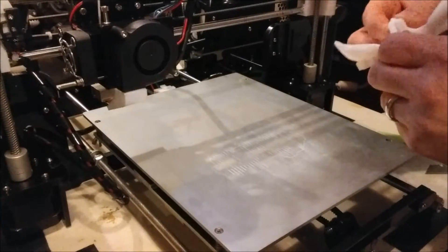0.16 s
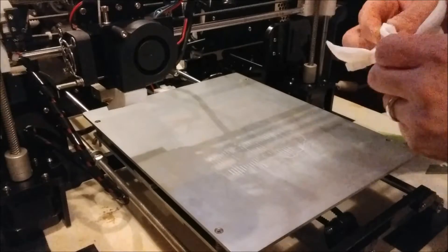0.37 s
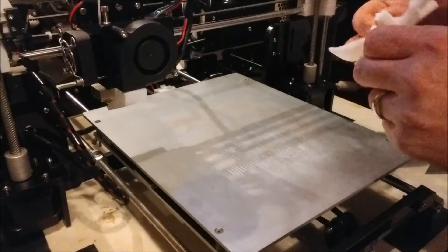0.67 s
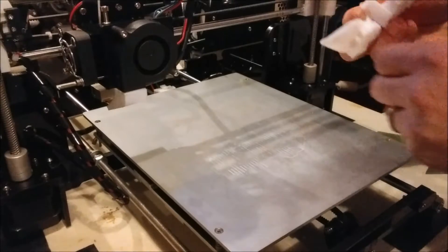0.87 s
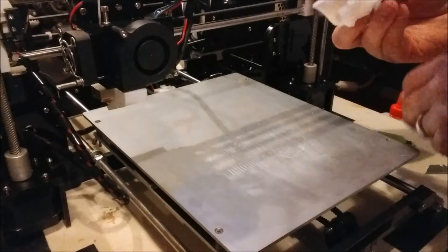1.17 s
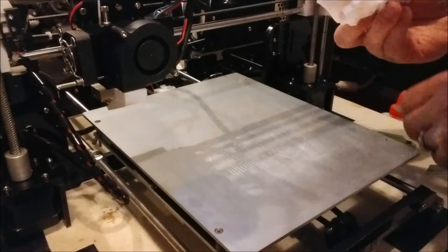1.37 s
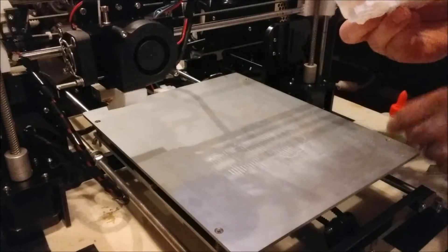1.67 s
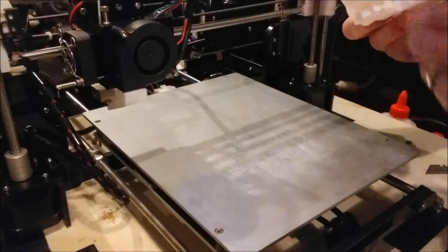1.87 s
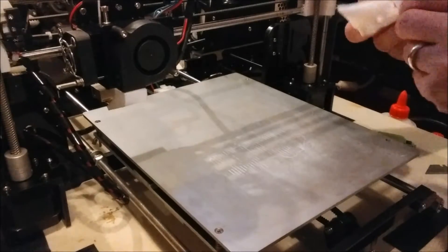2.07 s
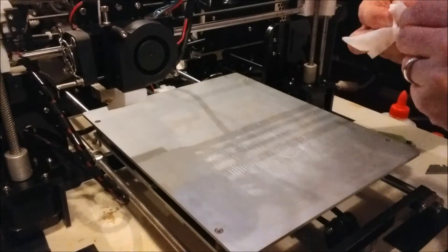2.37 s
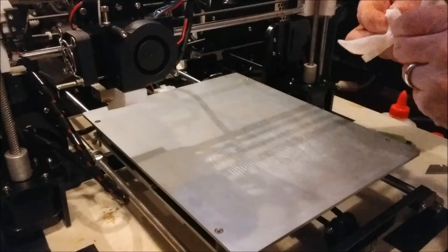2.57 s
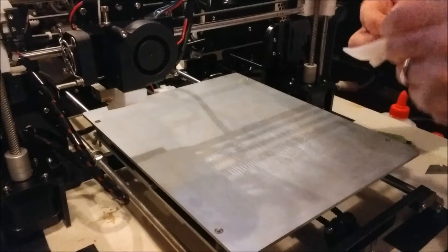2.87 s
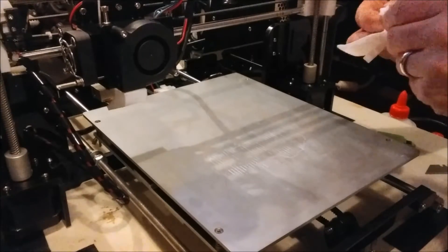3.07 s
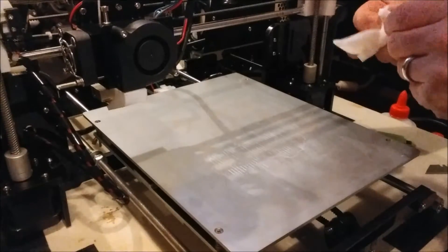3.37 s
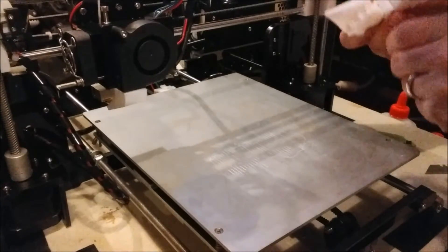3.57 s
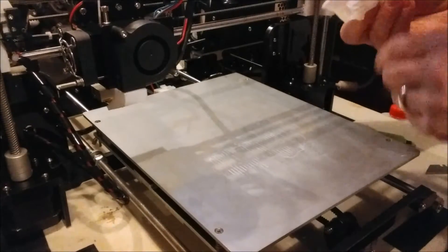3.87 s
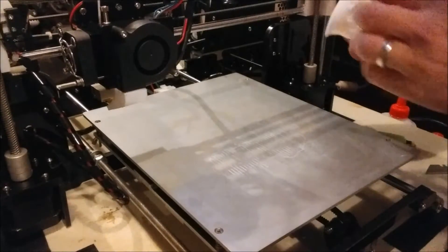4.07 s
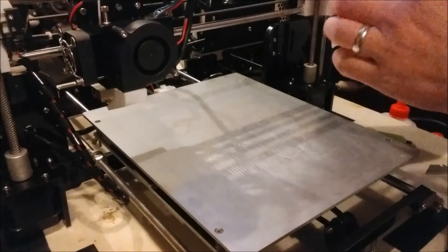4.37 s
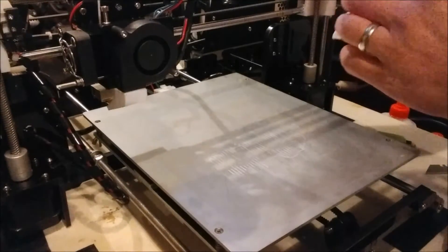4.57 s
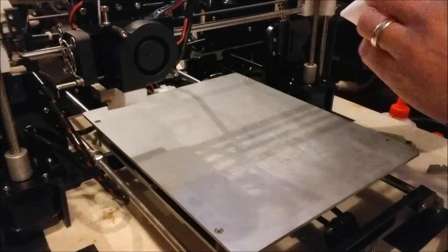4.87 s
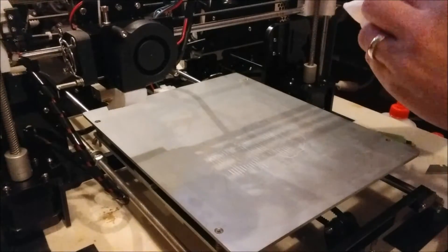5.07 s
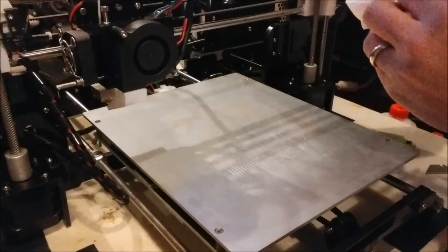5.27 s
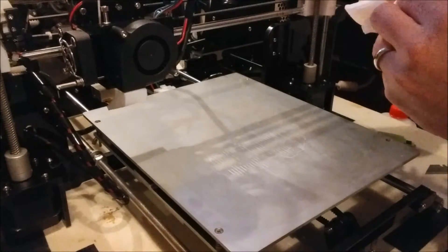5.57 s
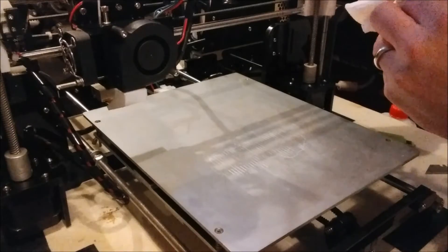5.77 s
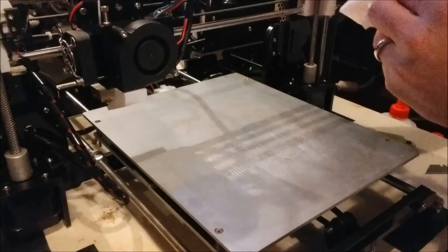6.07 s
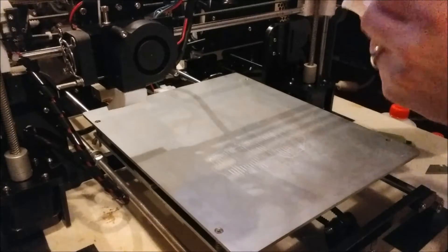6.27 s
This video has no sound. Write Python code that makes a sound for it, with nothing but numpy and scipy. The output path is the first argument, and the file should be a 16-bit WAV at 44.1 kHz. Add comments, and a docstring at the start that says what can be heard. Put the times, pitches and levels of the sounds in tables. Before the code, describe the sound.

A printer's fan whirs faintly throughout, with a low hum and light hiss, in a small room. Close to the microphone, fingernails tick and rasp very softly on a small plastic print from about 0.5 seconds. At 1.7 seconds a thin plastic sliver hits the table with a sharp click, bounces a few times and skitters to rest by 2.1. Between 2.8 and 3.4 seconds strained supports give small, high creaks and faint squeaks. At 3.9 seconds a thicker chunk clacks onto the table, bounces at 4.1 and rattles to a stop by 4.6. A brittle strut snaps sharply at about 5 seconds, followed by a quick cluster of cracks at 5.3. From 5.4 seconds a tiny chip bounces with bright ticks that fade by 5.9, and a last faint nail tick comes near 6.1. Each click has a short room tail.

```python
"""Picking supports off a 3D print

A small room, one microphone close to the table. Beside it an idle printer's fan whirs over faint
hum and hiss. Fingernails tick and rasp on the ridges of a small plastic print. A sliver drops and
bounces, ringing the table; strained supports squeak and creak; a chunk drops too. Then brittle
struts crack in the hand, and a tiny chip ticks to rest. Each click has a short room tail."""
import sys
import numpy as np
from scipy import signal
from scipy.fft import rfft, irfft, next_fast_len
from scipy.io import wavfile
from scipy.ndimage import uniform_filter1d

SR = 44100
rng = np.random.default_rng(int(sys.argv[2]) if len(sys.argv) > 2 else 0)


def transcribe(signal):
    """Save signal, clipped to [-1, 1], as a 16-bit WAV file at the path in sys.argv[1]."""
    frames = np.atleast_2d(signal).T
    limited = np.clip(frames, -1, 1)
    pcm = np.round(limited * 32767).astype(np.int16)
    wavfile.write(sys.argv[1], SR, pcm)


N = 282857


def from_db(db):
    return 10 ** (np.asarray(db) / 20)


def rms_one(x):
    return x / np.sqrt(np.mean(x ** 2) + 1e-20)


def bins(size):
    """Frequencies of a real FFT, kept above zero."""
    return np.maximum(np.arange(size // 2 + 1) * SR / size, 1)


def at_hz(points, hz):
    """Reads the columns of a table on a log-frequency axis."""
    points_hz, *columns = np.transpose(points)
    return np.squeeze([np.interp(np.log(hz), np.log(points_hz), column) for column in columns])


def response_db(colour, modes, hz):
    """A broad colour with steep-sided resonances standing out of it."""
    peaks = sum((from_db(db) ** 2 - 1) / (1 + 2 * ((hz - centre) / width) ** 2) ** 2
                for centre, width, db in modes)
    return at_hz(colour, hz) + 10 * np.log10(np.maximum(1 + peaks, 1e-3))


def coloured(force, colour, modes):
    """A running force through a colour and its resonances, at rms 1."""
    size = 2 * next_fast_len(N // 2 + 1)
    gain = from_db(response_db(colour, modes, bins(size)))
    return rms_one(irfft(rfft(force, size) * gain)[:N])


def noise_band(hz, width_hz):
    """A narrow band of noise at rms 1."""
    band = signal.butter(2, [hz - width_hz / 2, hz + width_hz / 2], "band", fs=SR, output="sos")
    return rms_one(signal.sosfilt(band, rng.standard_normal(N)))


def drift(rate_hz):
    """Slow random wander of spread 1."""
    return rms_one(irfft(rfft(rng.standard_normal(N)) / (1 + (bins(N) / rate_hz) ** 2), N))


def swells(rows):
    """An envelope with one bell-shaped rise and fall for each row."""
    t = np.arange(N) / SR
    return sum(from_db(db) * np.exp(-((t - peak_s) / half_s) ** 2) for peak_s, db, half_s in rows)


def grains(spread_db, size):
    """A dense run of tiny fractures or contacts of very uneven strength."""
    return rng.standard_normal(size) * from_db(spread_db * np.clip(rng.standard_normal(size), -2, 2))


def add(out, start_s, sound):
    at = max(round(start_s * SR), 0)
    out[at:at + len(sound)] += sound[:max(N - at, 0)]


def minimum_phase(x, gain_db):
    """Filters so that resonances ring after the blow, never before it."""
    cepstrum = irfft(np.log(from_db(gain_db)))
    cepstrum[1:len(x) // 2] *= 2
    cepstrum[len(x) // 2 + 1:] = 0
    return irfft(rfft(x) * np.exp(rfft(cepstrum)))


def click(force, colour, modes, body_db, edge_db, body_hz=4300, edge_hz=8700):
    """A force rings the plastic: thick pieces have more low body, thin ones more high edge."""
    hz = bins(len(force))
    # so brief a contact feeds all broad bands alike: the force's own colour is taken out
    force_db = 10 * np.log10(uniform_filter1d(np.abs(rfft(force)) ** 2, size=60) + 1e-9)
    shelves_db = body_db / (1 + (hz / body_hz) ** 6) + edge_db / (1 + (edge_hz / hz) ** 16)
    sound = minimum_phase(force, response_db(colour, modes, hz) + shelves_db - force_db)
    return sound * np.sqrt(.01 * SR / np.sum(sound ** 2))  # the energy of 10 ms at rms 1


# The small room around the table. Each row: frequency in Hz, seconds to fall 60 dB, level in dB.
ROOM_DECAY = [(300, 0.32, -9), (1500, 0.81, 3.5), (3520, 0.43, 4.5), (5140, 0.48, 1.5), (7550, 0.38, 4.5),
              (12000, 0.29, 5), (15000, 0.39, 5)]


def room_tail(build_s=0.00046, size=16384):
    """Uneven reflections, of unit energy in all, that die band by band."""
    t, hz = np.arange(size) / SR, bins(size)
    reflections = rfft(grains(spread_db=5, size=size))
    tail = np.zeros(size)
    edges_hz = np.geomspace(150, 18000, 15)
    for low, high in zip(edges_hz, edges_hz[1:]):
        t60, db = at_hz(ROOM_DECAY, np.sqrt(low * high))
        band = irfft(reflections * ((hz >= low) & (hz < high)), size)
        tail += band * from_db(db - 60 * t / t60)
    tail *= 1 - np.exp(-t / build_s)
    return tail / np.sqrt(np.sum(tail ** 2))


# A surface near the microphone. Each row: delay in seconds, level in dB.
NEAR_ECHOES = [(.0049, -11.5)]


def in_room(force, tail_db, colour, modes, body_db=0, edge_db=0, tail_ring_share=.6):
    """A click as it reaches the microphone: direct, off a near surface, and as the room's tail."""
    direct = click(force, colour, modes, body_db, edge_db)
    # the tail gathers sound from all directions, so its resonances are flatter
    flatter = [(hz, width_hz, db * tail_ring_share) for hz, width_hz, db in modes]
    diffuse = click(signal.unit_impulse(len(force)), colour, flatter, body_db, edge_db)
    out = from_db(tail_db) * signal.fftconvolve(diffuse, room_tail())
    for delay_s, db in [(0.00019, 0)] + NEAR_ECHOES:
        add(out, delay_s, from_db(db) * direct)
    return out


# Air from the printer's cooling fan. Each row: frequency in Hz, relative level in dB.
FAN_COLOUR = [(25, -22), (60, -15), (130, -5), (220, -5), (300, -2), (560, 0), (900, -1.5), (1150, -7),
              (2000, -10), (2700, -10), (3400, -19.5), (8000, -34)]
# Resonances of its housing and frame. Each row: frequency in Hz, width in Hz, height in dB.
HOUSING_MODES = [(84, 10, 12), (175, 20, 7), (260, 14, 4), (297, 22, 9), (336, 12, 10), (365, 8, 6),
                 (411, 14, 9), (467, 12, 9), (495, 14, 9), (525, 20, 5), (564, 10, 12), (579, 10, 14),
                 (622, 14, 7), (660, 11, 14), (747, 12, 4), (786, 8, 6), (850, 12, 5), (867, 8, 9),
                 (918, 20, 7), (972, 28, 10), (1092, 18, 6), (1355, 50, 6), (1447, 20, 5), (1699, 22, 12)]


def fan(level_db=-58, flutter_db=1.3):
    """Gently fluttering air rings the fan's housing."""
    gain = from_db(level_db + flutter_db * drift(rate_hz=10))
    return gain * coloured(rng.standard_normal(N), FAN_COLOUR, HOUSING_MODES)


def mains_hum(hz=120.2, level_db=-78):
    """The mains hums on one faint, steady tone."""
    t = np.arange(N) / SR
    return from_db(level_db) * rms_one(np.sin(2 * np.pi * hz * t))


# The hiss behind everything. Each row: frequency in Hz, relative level in dB.
HISS_COLOUR = [(1000, -24), (3600, -6.5), (4500, 1), (5200, 0), (6200, -1), (7600, 5), (8050, -3.5),
               (8600, -12), (10300, -6), (11600, -11), (13000, -18.5), (16000, -24)]


def hiss(level_db=-65.5):
    """An even, bright noise floor."""
    return from_db(level_db) * coloured(rng.standard_normal(N), HISS_COLOUR, [])


# A faint flutter in the background. Each row: centre in Hz, width in Hz, level in dB.
FLUTTER_BANDS = [(2403, 230, -71.5), (4506, 380, -74.5)]


def fluttering_bands(flutter_db=3, flutter_hz=25):
    """Two faint, narrow bands of background noise near 2.4 and 4.5 kHz flutter quickly."""
    out = np.zeros(N)
    for hz, width_hz, db in FLUTTER_BANDS:
        fluttering = noise_band(hz, width_hz) * from_db(flutter_db * drift(flutter_hz))
        out += from_db(db) * rms_one(fluttering)
    return out


# Fingernails on the print, faint even up close. Each row: start in seconds, level in dB, ring in Hz.
NAIL_PICKS = [(.4535, -68, 10000), (.458, -73, 11000), (.608, -67, 13300), (.617, -65, 11300),
              (2.829, -70, 11800), (2.848, -65, 11500), (3.2305, -72, 12000), (4.776, -69, 12000),
              (4.932, -74, 13000), (5.745, -59, 13500), (5.886, -65, 14000), (6.072, -63.5, 10200)]
# Their colour. Each row: frequency in Hz, relative level in dB.
NAIL_COLOUR = [(1000, -35), (6000, -3), (9500, -2), (12000, -1), (15000, -14), (16000, -13)]


def nail_picks(fade_s=0.0016, ring_width_hz=900, ring_db=5, tail_db=-7, size=2048):
    """A fingernail flicks over a layer ridge: a dry tick, all treble."""
    out, t = np.zeros(N), np.arange(size) / SR
    for start_s, db, ring_hz in NAIL_PICKS:
        force = grains(spread_db=4, size=size) * np.exp(-t / fade_s)
        modes = [(ring_hz, ring_width_hz, ring_db)]
        add(out, start_s, from_db(db) * in_room(force, tail_db, NAIL_COLOUR, modes))
    return out


# Fingers rubbing the print, and loose bits skittering.
# Each row: peak time in seconds, level in dB, half length in seconds.
RUB_STROKES = [(0.648, -64.5, 0.043), (1.154, -67, .065), (1.91, -58.5, 0.17), (2.915, -64, 0.098),
               (3.168, -69.5, 0.15), (3.387, -62.5, 0.049), (4.408, -58, 0.29)]
# The rasp's colour. Each row: frequency in Hz, relative level in dB.
RASP_COLOUR = [(200, -25), (700, -6), (2400, -11.5), (4500, -3.5), (6500, -2), (7800, -9), (8700, -20),
               (11500, -12.5), (13500, -31), (16000, -28)]
# Its resonances. Each row: frequency in Hz, width in Hz, height in dB.
RASP_MODES = [(1750, 100, 16), (3100, 73, 9.4), (5700, 160, 2)]


def rubs(roughness_db=3.5):
    """Ridged layers catch and slip in a fine rasp that swells and fades with each stroke."""
    friction = grains(spread_db=2.5, size=N) * from_db(roughness_db * drift(rate_hz=55))
    return swells(RUB_STROKES) * coloured(friction, RASP_COLOUR, RASP_MODES)


# A drone in the fan. Each row: peak time in seconds, level in dB, half length in seconds.
DRONE_SWELLS = [(0.87, -73, .05), (1.187, -60.5, 0.076), (1.9, -53.5, 0.025), (1.984, -58, 0.063),
                (2.326, -64, 0.067), (6.025, -55, 0.055)]


def fan_drone():
    """The fan's strongest resonance swells now and then."""
    return swells(DRONE_SWELLS) * noise_band(hz=570, width_hz=36)


def bending_waves(force, lag_s):
    """In a board the treble outruns the bass; lag_s is the travel time at 1 kHz."""
    hz = bins(len(force))
    delay_s = lag_s * (np.sqrt(1000 / np.maximum(hz, 300)) - np.sqrt(1000 / hz[-1]))
    phase = 2 * np.pi * np.cumsum(delay_s) * SR / len(force)
    return irfft(rfft(force) * np.exp(-1j * phase))


def struck_spot(modes, spread_db=1.2):
    """Each spot that is hit favours other resonances."""
    shifts_db = spread_db * np.clip(rng.standard_normal(len(modes)), -1.5, 1.5)
    return [(hz, width_hz, db + shift) for (hz, width_hz, db), shift in zip(modes, shifts_db)]


# Bits landing on the table, near the microphone. Each row: start in seconds, level in dB, edge in dB
# (high on a corner, low on a flat side), height of the table's clack in dB, bit (0 sliver, 1 chunk).
LANDINGS = [(1.7009, -29.5, 10.5, 4.1, 0), (1.7035, -32, 1, 5.1, 0), (1.7078, -32.5, 5, 6.3, 0),
            (1.7849, -43.5, 8, 4, 0), (1.8464, -40.5, 8, 6, 0), (1.896, -43.5, 4, 5.2, 0),
            (1.93, -65, -9, 12, 0), (1.955, -57, 3, 8.7, 0), (1.969, -61, -9, 10, 0), (2.0, -57, -9, 13, 0),
            (2.014, -62, -6, 10, 0), (2.037, -61, -9, 11, 0), (2.054, -57.5, -7, 8.3, 0),
            (3.9448, -26, 1.5, 12, 1), (4.1446, -30, 2.5, 1.8, 1), (4.2775, -39, 2.5, 17, 1),
            (4.302, -43, 1, 9.9, 1), (4.3853, -39, 12, 12, 1), (4.4525, -45, -8, 15, 1),
            (4.4805, -48, -8, 7.1, 1), (4.5304, -39.5, -13, 13, 1), (4.561, -53, -9, 3, 1),
            (4.5903, -51.5, 1, 11, 1), (4.613, -56, -11, 6, 1)]
# A landing's colour. Each row: frequency in Hz, relative level in dB.
LANDING_COLOUR = [(40, -47), (150, -20), (600, -4), (1450, -4), (2600, 1), (5600, -3), (6700, 0),
                  (7900, -5.5), (8500, -13.5), (9900, -12), (11100, -17), (12100, -18.5), (12900, -31),
                  (16000, -39)]
# Resonances of the table, the hollows between them, and resonances of the thin sliver and the thicker
# chunk. Each row: frequency in Hz, width in Hz, height in dB.
TABLETOP_MODES = [(570, 50, 9), (660, 45, 5), (780, 50, 6), (950, 70, 5), (1705, 48, 12), (2105, 110, 8),
                  (2520, 90, 3), (4130, 130, 7), (4870, 130, 8), (5740, 120, 3), (6760, 110, 4),
                  (7610, 130, 4)]
TABLETOP_HOLLOWS = [(1090, 140, -6), (1520, 280, -14), (1900, 150, -9), (2700, 260, -9), (4700, 160, -4),
                    (5330, 260, -3)]
SLIVER_RINGS = [(3090, 57, 13), (6540, 280, 11), (7800, 690, 7), (11560, 420, 14.5), (13600, 1150, 10)]
CHUNK_RINGS = [(1290, 170, 7.6), (3470, 280, 2.8), (3820, 110, 2.4), (4380, 350, 3.8), (5530, 130, 3.2),
               (6300, 130, 2.1), (9700, 400, 2.2), (11900, 440, 10.6), (14600, 1000, 2)]


def bounces(contact_s=.0017, rattle_db=-21, rattle_s=0.0085, clack_width_hz=180, size=4096):
    """A springy bit meets the table with several corners: a burst of chatter, then a faint rattle."""
    out, t = np.zeros(N), np.arange(size) / SR
    age = t / contact_s
    chatter = (age + 0.32) * np.exp(-age)
    rattle = from_db(rattle_db) * np.exp(-t / rattle_s)
    for start_s, db, edge_db, clack_db, is_chunk in LANDINGS:
        if is_chunk:
            bit_modes, neutral_db, bass_db = CHUNK_RINGS, -36.5, 0
        else:  # the light sliver hardly moves the table, so it has less bass
            bit_modes, neutral_db, bass_db = SLIVER_RINGS, -41.5, -3.5
        colour = [(hz, level_db + bass_db * (hz < 1600)) for hz, level_db in LANDING_COLOUR]
        body_db = neutral_db - db  # a softer landing is duller
        contacts = grains(spread_db=2.0, size=size) * (chatter + rattle)
        force = bending_waves(contacts, lag_s=0.002224)
        modes = struck_spot(TABLETOP_MODES + bit_modes) + TABLETOP_HOLLOWS
        clack_hz = 3110 + rng.uniform(-98, 70)  # the pitch strays from spot to spot
        modes.append((clack_hz, clack_width_hz, clack_db))
        landing = in_room(force, tail_db=-10, colour=colour, modes=modes,
                          body_db=body_db, edge_db=edge_db)
        add(out, start_s, from_db(db) * landing)
    return out


# A support bent in the hand. Each row: peak time in seconds, level in dB, half length in seconds.
SQUEAK_SLIPS = [(2.844, -62.5, 0.017), (3.115, -58, .004), (3.16, -65, 0.028)]


def squeaks():
    """Strained plastic slips on plastic in a short, narrow squeak."""
    return swells(SQUEAK_SLIPS) * noise_band(hz=6060, width_hz=410)


def crack(fade_s, colour, modes, body_db, edge_db, tail_db, first_break=2.2, size=4096):
    """Brittle plastic: one sharp impulse, then a dying run of tiny ones, heard in the room."""
    t = np.arange(size) / SR
    force = rms_one(grains(spread_db=3.0, size=size)) * np.exp(-t / fade_s)
    force[0] = first_break
    return in_room(force, tail_db, colour, modes, body_db, edge_db)


# Struts slipping under strain. Each row: start in seconds, level in dB, fade time in seconds,
# edge in dB, lower ring in Hz, upper ring in Hz.
STRUT_CREAKS = [(2.88, -56, .01, 0, 3280, 6100), (2.892, -56, .0023, 8, 7040, 10300),
                (2.896, -44.5, .0008, 9, 6000, 7100), (2.8978, -54, 0.0037, 0, 3150, 9400),
                (2.956, -54, 0.0076, -11, 3280, 3900), (2.98, -47.5, .0025, -6, 3280, 6620),
                (3.3141, -42.5, 0.0018, 3, 6230, 8040), (3.33, -58, .001, 4, 6300, 7900),
                (3.343, -57, .001, 7, 6150, 7600), (3.351, -58, .001, 4, 6300, 7700)]
# Their colour. Each row: frequency in Hz, relative level in dB.
STRAIN_COLOUR = [(200, -35), (2000, -25), (3400, -4), (4900, -9), (6600, -1.5), (7900, 0), (8800, -10),
                 (9700, -5), (11500, -19), (13000, -26), (16000, -36)]


def creaks(ring_width_hz=330, ring_db=13):
    """A strained strut gives a little without breaking: a small click on two resonances."""
    out = np.zeros(N)
    for start_s, db, fade_s, edge_db, *rings_hz in STRUT_CREAKS:
        modes = [(hz, ring_width_hz, ring_db) for hz in rings_hz]
        creak = crack(fade_s, STRAIN_COLOUR, modes, body_db=0, edge_db=edge_db, tail_db=-8)
        add(out, start_s, from_db(db) * creak)
    return out


# Struts breaking in the hand, close to the microphone. Each row: start in seconds, level in dB,
# fade time in seconds, body in dB (high when the whole print bends), edge in dB (high for a thin
# strut), the strut's own ring in Hz, its height in dB.
STRUT_SNAPS = [(5.051, -25, 0.0016, -9.5, -4.5, 12300, 14), (5.2757, -31, 0.0024, -3, 5.5, 11900, 6),
               (5.2818, -28.5, 0.003, -3.5, 6.5, 12200, 9), (5.2848, -30, 0.0091, 1.5, -5, 5240, 1),
               (5.2934, -30.5, 0.0038, 1, -3, 7600, 4), (5.2964, -37.5, 0.015, 11.5, -10, 7450, 3),
               (5.312, -43, .001, -9, -8, 7300, 5), (5.3274, -47, 0.001, -8, -11, 7600, 12),
               (5.331, -42, 0.0071, -2, -11, 7640, 12)]
# The brittle plastic's colour. Each row: frequency in Hz, relative level in dB.
PLASTIC_COLOUR = [(150, -63), (600, -19), (2200, -18), (3700, -12.5), (4600, -11), (6000, -7.5),
                  (7900, -3.5), (8500, -14.5), (9400, -8.5), (10500, -9), (11300, -12.5), (12300, -18),
                  (13400, -36), (14700, -29), (16000, -57)]
# Its resonances. Each row: frequency in Hz, width in Hz, height in dB.
PLASTIC_MODES = [(5950, 400, 2), (7575, 250, 4), (8080, 220, 4), (9500, 400, 2)]


def snaps(ring_width_hz=510):
    """A strut gives way at once, then the crack runs on through the layers."""
    out = np.zeros(N)
    for start_s, db, fade_s, body_db, edge_db, ring_hz, ring_db in STRUT_SNAPS:
        modes = PLASTIC_MODES + [(ring_hz, ring_width_hz, ring_db)]
        snap = crack(fade_s, PLASTIC_COLOUR, modes, body_db, edge_db, tail_db=-8)
        add(out, start_s, from_db(db) * snap)
    return out


# A chip of the same plastic on a hard surface nearby.
# Each row: start in seconds, level in dB, fade time in seconds, body in dB, edge in dB.
CHIP_TICKS = [(5.4416, -27, 0.00024, -11.5, 6), (5.4442, -30.5, 0.00068, -13, 5),
              (5.5866, -43, 0.0012, -5, -6.5), (5.641, -36.5, 0.0013, -9.5, 3),
              (5.6945, -42, 0.00082, -8, 5.5), (5.7578, -55.5, 0.00055, -5, 3),
              (5.816, -58.5, 0.00054, -11, 2), (5.8278, -57.5, .0005, -7, 3), (5.8692, -64, .0005, -7, 7),
              (5.9188, -63, .001, -12, 14)]


def chip(ring_hz=11900, ring_width_hz=510, ring_db=14.5):
    """A tiny chip ticks brightly at one pitch as it bounces to rest."""
    out = np.zeros(N)
    modes = PLASTIC_MODES + [(ring_hz, ring_width_hz, ring_db)]
    for start_s, db, fade_s, body_db, edge_db in CHIP_TICKS:
        tick = crack(fade_s, PLASTIC_COLOUR, modes, body_db, edge_db, tail_db=-7)
        add(out, start_s, from_db(db) * tick)
    return out


def scene():
    """Handwork at the table over the idle printer, in mono."""
    background = fan() + mains_hum() + hiss() + fluttering_bands() + fan_drone()
    handwork = nail_picks() + rubs() + bounces() + squeaks() + creaks() + snaps() + chip()
    return (background + handwork)[None]


def record(dry):
    """The microphone's signal is cut steeply above 16 kHz."""
    return signal.sosfilt(signal.ellip(10, .1, 70, 16000, fs=SR, output="sos"), dry)


dry = scene()
out = record(dry)
transcribe(out)
```